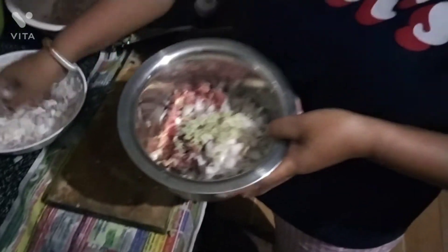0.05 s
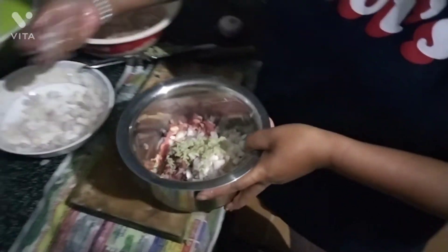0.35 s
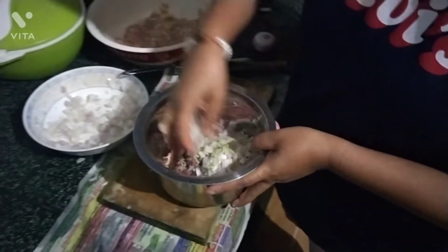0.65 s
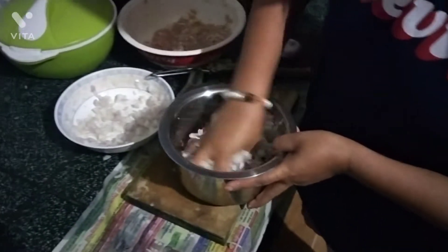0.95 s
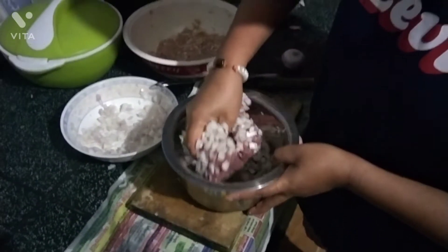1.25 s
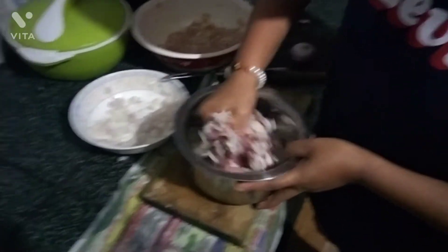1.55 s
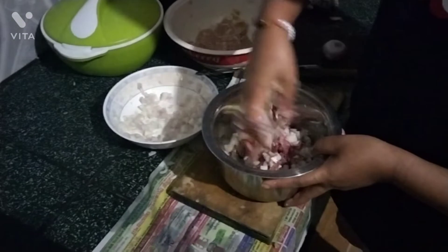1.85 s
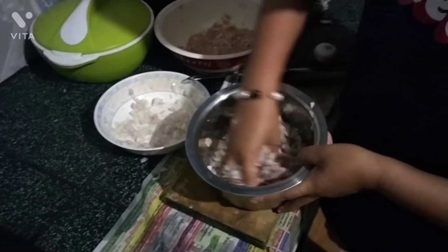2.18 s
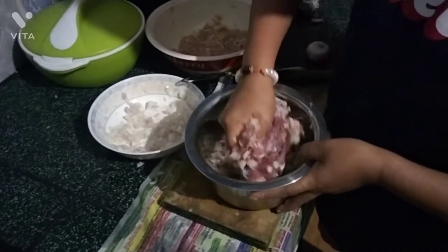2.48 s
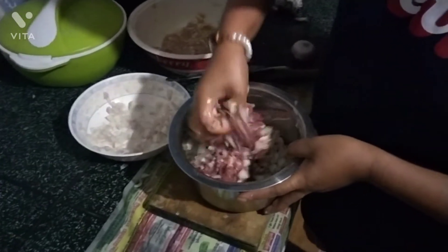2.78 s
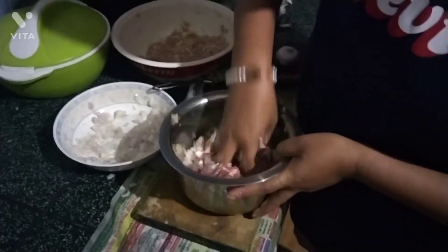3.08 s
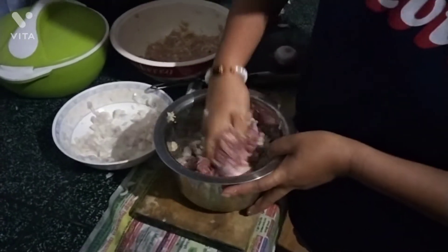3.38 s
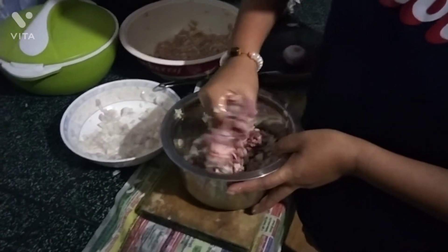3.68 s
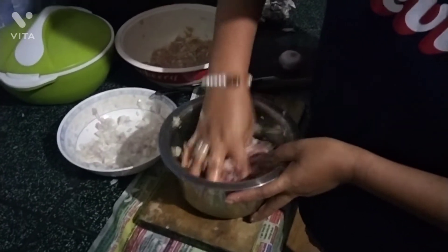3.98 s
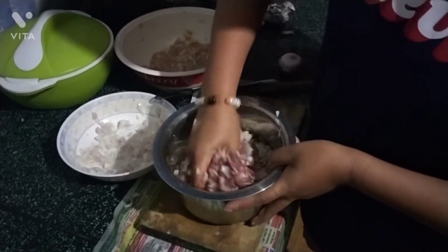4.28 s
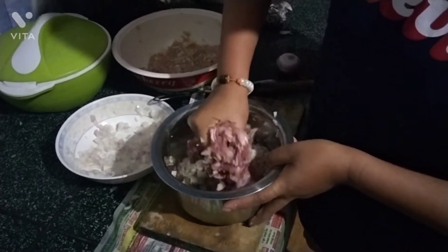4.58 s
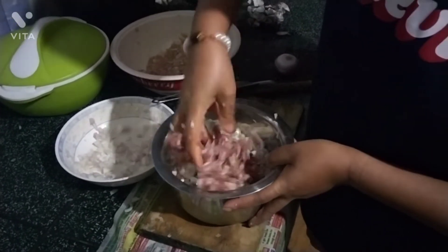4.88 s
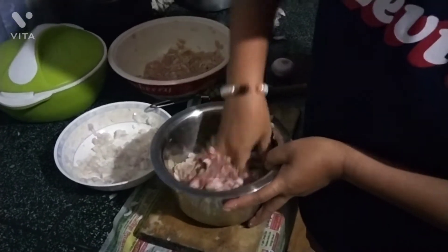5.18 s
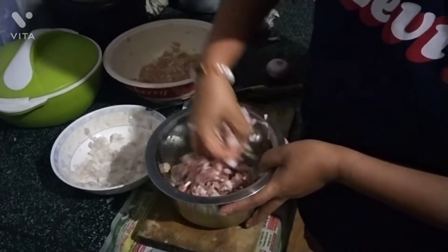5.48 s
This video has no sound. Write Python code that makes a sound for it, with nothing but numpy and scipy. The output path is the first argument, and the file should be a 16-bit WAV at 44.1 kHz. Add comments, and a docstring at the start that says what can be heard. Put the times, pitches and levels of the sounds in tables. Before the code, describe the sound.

A hand kneads wet minced meat in a steel bowl, with sticky crackles, small pops and a few bracelet clinks.

```python
"""A small tiled kitchen: a hand kneads minced meat and chopped onion in a steel bowl.
With each stroke wet films tear and crackle, air pockets pop and the lump spreads with a squish.
A bead bracelet clinks on the bowl, damped by the meat and the other hand.
Behind it: a distant motor's wavering drone, a thin hiss and room noise."""
import sys
import numpy as np
from scipy import signal
from scipy.fft import rfft, irfft
from scipy.io import wavfile
from scipy.ndimage import uniform_filter1d

SR = 44100
rng = np.random.default_rng(int(sys.argv[2]) if len(sys.argv) > 2 else 0)


def dump_mix(stems):
    """Bounce the given channels to the path in sys.argv[1] as a 16-bit WAV at rate SR."""
    frames = np.atleast_2d(stems).T  # one column per channel
    limited = np.clip(frames, -1, 1)  # hard clip at full scale
    pcm = np.round(limited * 32767).astype(np.int16)
    wavfile.write(sys.argv[1], SR, pcm)


N = 248833
TIME_S = np.arange(N) / SR
TOP_HZ = 15800

# Room noise spectrum. Each row: frequency in Hz, relative density in dB.
ROOM_SPECTRUM = [(20,4.5),(55,-15),(133,-8),(170,-14),(212,-4.5),(270,-12.5),(330,-17),(430,-15.5),(600,-17),(1050,-24.5),(1700,-22.5),(3300,-26),(5500,-38),(9000,-36.5),(16000,-49)]
# Room noise envelope. Each row: time in seconds, level in dB.
ROOM_ENVELOPE = [(0, -60), (1.3, -55.5), (3.3, -62.5), (5.64, -65.5)]
# Motor envelope. Each row: time in seconds, fundamental in dB, third harmonic in dB.
MOTOR_ENVELOPE = [(0.1, -52.5, -93), (0.37, -50.5, -76), (0.8, -49.5, -99), (1.03, -57, -93),
                  (1.54, -44, -68), (2.27, -46, -75), (2.69, -48.5, -56.5), (3.65, -58, -71.5),
                  (4.4, -63, -63.5), (4.7, -57.5, -63.5), (5.6, -65, -72.5)]
# Steel bowl modes. Each row: frequency in Hz, relative level in dB.
BOWL_MODES = [(2883,-16),(3136,-8),(3400,-14),(3700,-10),(5539,-15),(6000,-10),(6250,-10),(6600,-7),(6805,-6),(7009,-7),(7650,-13),(8228,0),(8380,-7),(8646,-9),(8925,-9),(9329,-6),(9600,-10),(9943,-10),(10200,-9),(10600,-9),(10890,-4),(11178,-11),(12121,-16),(12760,-12),(12980,-12),(13700,-15),(14300,-15),(14715,-14),(15181,-14),(15531,-14)]
# Registers that group the modes. Each entry: centre in Hz.
REGISTERS_HZ = [3400, 6500, 8300, 10300, 14000]
# Bead strikes. Each row: start in seconds, rebound delay in seconds, low and high favoured
# notes in Hz, then a level in dB for each of the five registers.
BEAD_STRIKES = [(1.2516,.0025,3700,6000,-32,-36,-32,-35,-36),(2.1203,.002,7000,9450,-43,-27,-34,-27,-34),(3.1158,.003,6750,9330,-35,-23,-31,-22,-31),(3.8958,.0065,8230,10890,-34,-25,-20,-22,-27),(3.9135,.003,6800,8230,-46,-38,-30,-30,-37),(4.038,.0025,6700,8300,-39,-28,-22,-29,-31),(5.1882,.0035,3130,10890,-32,-33,-28,-26,-32)]
# Bowl bumping the board. Each row: start in seconds, level in dB, pitch in Hz.
BOWL_BUMPS = [(0.979,-43,61),(1.18,-55,84),(2.918,-49,127)]
# Air between palm, lump and bowl. Each row: pitch in Hz, width in Hz, level in dB relative to
# the stroke's thud, fade in seconds.
PALM_CAVITY = [(748, 180, -0.5, 0.072), (410, 190, -2.5, 0.026)]
# Hollows collapsing in the lump. Each row: start in seconds, level in dB, pitch in Hz,
# width in Hz, fade in seconds.
LUMP_HOLLOWS = [(1.325, -50, 2330, 900, 0.042), (1.53, -65, 2258, 302, 0.11),
                (2.047, -48, 1800, 400, 0.017), (3.058, -49, 1220, 354, 0.037),
                (3.632, -52, 1800, 700, .0074), (3.915, -58.5, 1090, 400, 0.041),
                (4.46, -56, 1650, 600, 0.0046), (5.472, -50.5, 1520, 600, 0.0053)]
# Large air pockets. Each row: start in seconds, ring level in dB, pitch in Hz, tick level in dB.
POCKET_POPS = [(0.6017, -42.5, 3760, -36), (.655, -42, 3940, -35.5), (0.675, -35, 4200, -39),
               (1.0565, -45.5, 2680, -40.5), (1.1045, -43, 3450, -55), (1.136, -41, 3130, -54),
               (1.78, -32, 3450, -33), (1.8055, -31, 3480, -29.5), (1.836, -40, 3380, -37),
               (1.8587, -31.5, 3980, -25.5), (1.9958, -41, 2680, -52), (2.1717, -36, 3300, -48),
               (2.229, -31, 3210, -27), (2.4752, -37.5, 2930, -34), (2.5409, -33, 3100, -36.5),
               (2.626, -41, 3940, -58), (2.7958, -43.5, 3320, -39.5), (2.9134, -21, 3100, -20),
               (2.9293, -31, 3410, -23), (2.988, -31, 3330, -32), (3.277, -39.5, 3300, -50),
               (3.629, -38.5, 2960, -47), (3.8616, -31, 3500, -28), (4.0907, -30, 3780, -21),
               (4.213, -38.5, 3200, -45), (4.3632, -42.5, 2990, -56), (4.6242, -28, 3190, -35),
               (4.784, -43.5, 3740, -39.5), (4.961, -32, 3840, -47), (5, -28.5, 3170, -46),
               (5.146, -44, 2980, -43), (5.327, -41.5, 3500, -43), (5.406, -40, 2640, -47)]
# Sticky strands snapping. Each row: start in seconds, level in dB, pitch in Hz, fade in seconds.
STRAND_SNAPS = [(.294, -52, 8970, 0.014), (.677, -20, 7560, 0.00055), (1.9132, -13, 7850, 0.00017),
                (1.916, -1.5, 8500, 0.00049), (1.922, -20, 8900, 0.0059), (2.303, -23, 8300, .002),
                (2.54, -25, 9900, 0.0022), (3.359, -34.5, 5630, 0.0053), (3.485, -33.5, 6470, 0.0086),
                (4.173, -27.5, 12600, .0059), (4.388, -32.5, 5160, 0.00073), (4.408, -25.5, 11400, 0.00067),
                (5.056, -30.5, 6400, 0.0036), (5.588, -51, 7360, 0.0033)]
# Spectrum of tearing films. Each row: frequency in Hz, relative density in dB.
FILM_SPECTRUM = [(1500,-12),(3050,4),(4900,-7),(6800,-9.5),(8500,6.5),(10000,-5),(12000,-7),(16000,-3.5)]
# Kneading strokes. Each row: touch, push, squeeze and let-go times in seconds, then stir, push,
# squeeze, squish and thud levels in dB.
KNEAD_STROKES = [(0.606, 0.739, 1.37, 1.52, -58.5, -46, -46, -49.5, -59),
                 (1.793, 1.909, 2.3, 2.603, -53.5, -35, -40.5, -49, -64),
                 (2.912, 2.92, 3.36, 3.74, -54.5, -34, -51.5, -57, -54),
                 (3.817, 3.896, 4.52, 4.58, -55.5, -36, -55, -58, -56.5),
                 (4.946, 4.982, 5.7, 5.08, -56, -44, -46, -71, -65)]


def undb(db):
    """dB to amplitude."""
    return 10 ** (np.asarray(db) / 20)


def unit(x):
    """Scale to rms 1."""
    return x / np.sqrt(np.mean(x ** 2))


def curves(table):
    """Table columns, interpolated over time."""
    times_s, *columns = np.transpose(table)
    return [np.interp(TIME_S, times_s, column) for column in columns]


def add(out, start_s, sound):
    """Mix a sound in at start_s."""
    i = int(np.clip(start_s * SR, 0, N - 1))
    out[i:i + len(sound)] += sound[:N - i]


def colour(x, outline):
    """Minimum-phase filter with a (Hz, dB) outline."""
    hz, db = np.transpose(outline)
    bins_hz = np.maximum(np.fft.rfftfreq(4096, 1 / SR), 1)
    cepstrum = irfft(np.log(undb(np.interp(np.log(bins_hz), np.log(hz), db))))
    cepstrum[1:2048] *= 2
    cepstrum[2049:] = 0
    return signal.fftconvolve(x, irfft(np.exp(rfft(cepstrum))))[:len(x)]


def bandpass(x, hz, width_hz, widen=2):
    """Two resonators in series, the second `widen` times as wide."""
    for stage_hz in (width_hz, width_hz * widen):
        x = signal.lfilter(*signal.iirpeak(hz, hz / stage_hz, fs=SR), x)
    return x


def highpass(x, hz):
    """Two-pole high-pass."""
    return signal.sosfilt(signal.butter(2, hz, "high", fs=SR, output="sos"), x)


def wander(rate_hz):
    """Ramps between random values; spread near 1."""
    hold = int(SR / rate_hz)
    return 1.2 * uniform_filter1d(rng.standard_normal(2000)[np.arange(N) // hold], hold)


def grains(per_s, spread_db):
    """Sparse impulses of unequal size, steady mean power."""
    size = undb(spread_db * np.minimum(rng.exponential(size=N), 4))
    train = (rng.random(N) < per_s / SR) * size * rng.choice([-1, 1], N)
    power = np.maximum(uniform_filter1d(train ** 2, size=2600), 0)
    return train / np.sqrt(power + 1e-6)


def room_noise():
    """Low noise that swells, then slowly ebbs."""
    return unit(colour(rng.standard_normal(N), ROOM_SPECTRUM)) * undb(curves(ROOM_ENVELOPE)[0])


def hiss(early_hz=7500, late_hz=6750, width_hz=800, level_db=-73, step_at_s=0.84):
    """Thin noise band that steps down in pitch once."""
    early, late = (unit(bandpass(rng.standard_normal(N), hz, width_hz, widen=1))
                   for hz in (early_hz, late_hz))
    return undb(level_db) * np.where(TIME_S < step_at_s, early, late)


def motor_drone(idle_hz=32.3, full_hz=39.2, run_up_at_s=1.5, lag_s=2.1):
    """A distant motor idles, then gathers speed; its level wavers."""
    first_db, third_db = curves(MOTOR_ENVELOPE)
    hz = full_hz - (full_hz - idle_hz) * np.exp(-np.maximum(TIME_S - run_up_at_s, 0) / lag_s)
    phase = 2 * np.pi * np.cumsum(hz) / SR
    return np.sqrt(2) * (undb(first_db) * np.sin(phase) + undb(third_db) * np.sin(3 * phase))


def kitchen_reverb(x, early_db=-8, early_fade_s=0.012, tail_db=-6, t60_s=0.42):
    """Add quick reflections off bowl and counter, then a small hard room's tail."""
    t = TIME_S[:SR * 3 // 4]
    early = rng.standard_normal(len(t)) * np.exp(-t / early_fade_s) * (t > 0.0007)
    tail = rng.standard_normal(len(t)) * 1000 ** (-t / t60_s) * (t > 0.006)
    response = undb(early_db) * early / np.linalg.norm(early)
    response += undb(tail_db) * tail / np.linalg.norm(tail)
    return x + signal.fftconvolve(x, response)[:N]


def bowl_bumps(fade_s=0.016):
    """The bowl bumps softly on the board."""
    out, t = np.zeros(N), TIME_S[:SR // 2]
    for start_s, db, hz in BOWL_BUMPS:
        add(out, start_s, undb(db) * np.sin(2 * np.pi * hz * t) * np.exp(-t / fade_s))
    return out


def hollow_bursts(events):
    """Grainy, fading noise bands, one per event."""
    out, t = np.zeros(N), TIME_S[:SR // 2]
    for start_s, db, hz, width_hz, fade_s in events:
        band = bandpass(grains(per_s=1800, spread_db=1.5)[:len(t)], hz, width_hz)
        add(out, start_s, undb(db) * unit(band) * np.exp(-t / fade_s))
    return out


def bead_knocks(relative_db=-16.5, hz=1520, width_hz=880, fade_s=0.012):
    """The loaded bowl knocks dully under each bead strike."""
    return hollow_bursts((start_s, np.mean(register_db) + relative_db, hz, width_hz, fade_s)
                         for start_s, _, _, _, *register_db in BEAD_STRIKES)


def bead_clinks(t60_s=0.028, tail_db=-29, tail_t60_s=0.2, rebound_db=1,
                crack_db=-7, crack_fade_s=0.0059, favour_db=4, favour_width_hz=170):
    """A bead strikes and rebounds; the spot it hits favours some modes, hand and meat damp them."""
    out, t = np.zeros(N), TIME_S[:SR // 4]
    # The load of meat splits each mode into a close pair.
    hz, mode_db = np.repeat(np.transpose(BOWL_MODES), 2, axis=1)
    nearest = np.abs(hz[:, None] - np.array(REGISTERS_HZ)).argmin(axis=1)
    in_register = nearest == np.arange(len(REGISTERS_HZ))[:, None]
    fade = 1000 ** (-t / t60_s) + undb(tail_db) * 1000 ** (-t / tail_t60_s)
    for start_s, rebound_s, low_hz, high_hz, *register_db in BEAD_STRIKES:
        favoured = sum(np.exp(-((hz - note) / favour_width_hz) ** 2) for note in (low_hz, high_hz))
        weights = in_register * undb(mode_db + favour_db * favoured)
        split_hz = hz + 35 * rng.standard_normal(len(hz))
        registers, contact = 0, 0
        for delay_s, db in ((0, 0), (rebound_s, rebound_db)):
            blow = undb(db) * (t >= delay_s)
            modes = np.sin(2 * np.pi * (split_hz[:, None] * t + rng.random((len(hz), 1))))
            registers += weights @ modes * blow * np.interp(t - delay_s, t, fade)
            contact += blow * np.exp(-(t - delay_s) / crack_fade_s)
        onset_rms = registers[:, :SR // 80].std(axis=1, keepdims=True)
        ring = undb(register_db) @ (registers / onset_rms)
        outline = [(500, -85), (2200, -58), (4800, -49), *zip(REGISTERS_HZ, register_db)]
        crack = colour(rng.standard_normal(len(t)) * contact, sorted(outline))
        crack *= undb(crack_db) * np.linalg.norm(ring) / np.linalg.norm(crack)
        add(out, start_s, ring + crack)
    return highpass(out, hz=1950)


def lump_squishes(squish_hz=1800, squish_width_hz=930, squish_fade_s=0.069):
    """Each push spreads the lump and sounds the air under the palm; hollows collapse in between."""
    events = []
    for _, push_s, *_, squish_db, thud_db in KNEAD_STROKES:
        events.append((push_s, squish_db, squish_hz, squish_width_hz, squish_fade_s))
        for hz, width_hz, db, fade_s in PALM_CAVITY:
            events.append((push_s, thud_db + db, hz, width_hz, fade_s))
    return hollow_bursts(events + LUMP_HOLLOWS)


def bubble(hz, fade_cycles, glide):
    """A small air cavity rings, rising in pitch as it opens."""
    age = np.arange(int(5 * fade_cycles * SR / hz) + 2) * hz / SR / fade_cycles
    return np.exp(-age) * np.sin(2 * np.pi * fade_cycles * (age + glide * age ** 2 / 2))


def bubble_swarm(per_s, spread_db, centre_hz, scatter_oct, wander_oct, fade_cycles):
    """Stream of tiny cavities; neighbours share a fold of meat and are alike in size."""
    train, out = grains(per_s, spread_db), np.zeros(N)
    octaves = scatter_oct * rng.standard_normal(N) + wander_oct * wander(rate_hz=45)
    hz = np.minimum(centre_hz * 2 ** octaves, TOP_HZ)
    for i in np.flatnonzero(train):
        add(out, i / SR, train[i] * bubble(hz[i], fade_cycles, glide=0.041))
    return unit(out)


def wet_tick(hz, fade_s):
    """A juice film tears: a short crack around one pitch, peak 1."""
    t = TIME_S[:1200]
    crack = bandpass(rng.standard_normal(len(t)) * np.exp(-t / fade_s), hz, width_hz=hz / 2)
    return crack / np.abs(crack).max()


def pops_and_snaps(fade_cycles=10.7, upper_ratio=1.144, upper_db=-7):
    """Large pockets burst with a tick and a double ring; strands snap with a tick alone."""
    out = np.zeros(N)
    for start_s, db, hz, tick_db in POCKET_POPS:
        add(out, start_s, undb(db) * bubble(hz, fade_cycles, glide=0.014))
        add(out, start_s, undb(db + upper_db) * bubble(hz * upper_ratio, fade_cycles, glide=0.034))
        add(out, start_s, undb(tick_db) * wet_tick(hz * 2.04, fade_s=0.0042))
    for start_s, db, hz, fade_s in STRAND_SNAPS:
        add(out, start_s, undb(db) * wet_tick(hz, fade_s))
    return highpass(out, hz=1800)


def small_pops(air_db, gain_db=-12):
    """Mid-sized pockets burst at random as the hand works."""
    pockets = bubble_swarm(per_s=23, spread_db=5.5, centre_hz=3300,
                           scatter_oct=0.17, wander_oct=0.055, fade_cycles=19)
    return pockets * undb(air_db + gain_db)


def squelch(air_db, gain_db=-2):
    """Tiny air pockets, squeezed out of the mince, radiate little bass."""
    pockets = bubble_swarm(per_s=600, spread_db=4.5, centre_hz=3380,
                           scatter_oct=0.18, wander_oct=0.22, fade_cycles=2.05)
    return unit(highpass(highpass(pockets, hz=1330), hz=2060)) * undb(air_db + gain_db)


def crackle(level_db, film_db=-2, fizz_db=-1.5, spurt_db=3):
    """Wet films tear between fingers, meat and steel; juice fizzes in spurts."""
    films = unit(colour(grains(per_s=1300, spread_db=4), FILM_SPECTRUM))
    fizz = bubble_swarm(per_s=700, spread_db=2, centre_hz=7550,
                        scatter_oct=0.16, wander_oct=0.19, fade_cycles=2.7)
    wet = highpass(undb(film_db) * films + undb(fizz_db) * fizz, hz=2870)
    return wet * undb(level_db + spurt_db * wander(rate_hz=52))


def gesture_db(start_s, end_s, rise_db_per_s=499, fall_db_per_s=71):
    """Rise, hold at 0 dB from start_s to end_s, fall."""
    rise_db = -rise_db_per_s * np.maximum(start_s - TIME_S, 0)
    return rise_db - fall_db_per_s * np.maximum(TIME_S - end_s, 0)


def kneading_levels_db(cling_db=-67.5, grab_re_push_db=-15.5, air_loss_db_per_s=17.5):
    """Crackle and air envelopes: each stroke stirs, grabs, pushes fast and squeezes slowly."""
    # Meat clings to the hand from the first touch on, even between strokes.
    films, air = [cling_db + gesture_db(KNEAD_STROKES[0][0], TIME_S[-1])], []
    for touch_s, push_s, squeeze_s, let_go_s, stir_db, push_db, squeeze_db, *_ in KNEAD_STROKES:
        stir = stir_db + gesture_db(touch_s, let_go_s)
        grab = push_db + grab_re_push_db + gesture_db(touch_s, push_s, fall_db_per_s=230)
        push = push_db + gesture_db(push_s, push_s, rise_db_per_s=1397, fall_db_per_s=230)
        squeeze = squeeze_db + gesture_db(squeeze_s, squeeze_s, rise_db_per_s=158, fall_db_per_s=210)
        films += [stir, grab, push, squeeze]
        # Air follows the films at dB offsets and runs out as the stirring goes on.
        air_left_db = 2 - air_loss_db_per_s * np.maximum(TIME_S - touch_s, 0)
        air += [stir + air_left_db, grab - 0.5, push - 0.5, squeeze - 8]
    return [20 * np.log10(np.linalg.norm(undb(parts), axis=0) + 1e-9) for parts in (films, air)]


def scene(spurt_db=4.5, kneading_gain_db=-2.5):
    """Meat and bowl in the kitchen, over drone, room noise and hiss; mono."""
    crackle_db, air_db = kneading_levels_db()
    air_db += spurt_db * wander(rate_hz=40)  # air leaves the mince unevenly
    meat = crackle(crackle_db) + squelch(air_db) + small_pops(air_db)
    meat += pops_and_snaps() + lump_squishes()
    bowl = bowl_bumps() + bead_knocks() + bead_clinks()
    kneading = undb(kneading_gain_db) * kitchen_reverb(meat + bowl)
    return (kneading + motor_drone() + room_noise() + hiss())[None]


def record(dry):
    """Steep low-pass at TOP_HZ."""
    return signal.sosfilt(signal.ellip(10, 0.2, 70, TOP_HZ, fs=SR, output="sos"), dry)


dry = scene()
out = record(dry)
dump_mix(out)
```